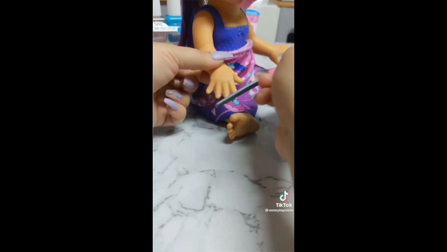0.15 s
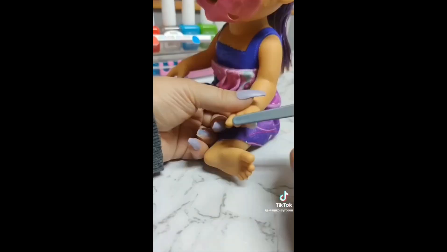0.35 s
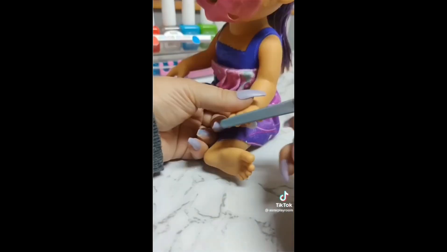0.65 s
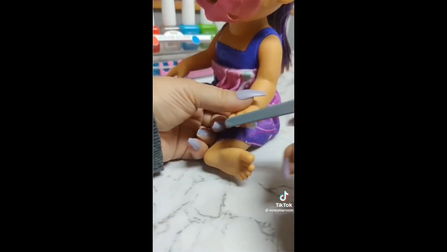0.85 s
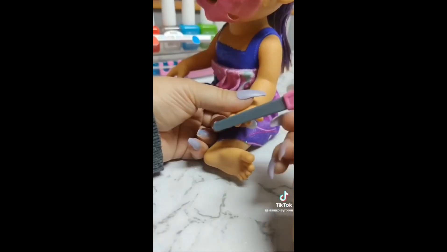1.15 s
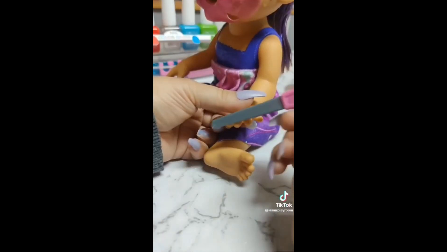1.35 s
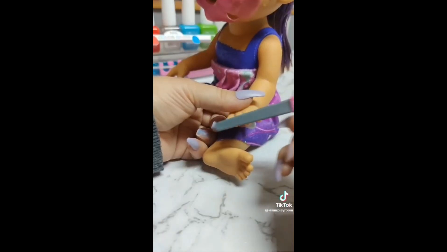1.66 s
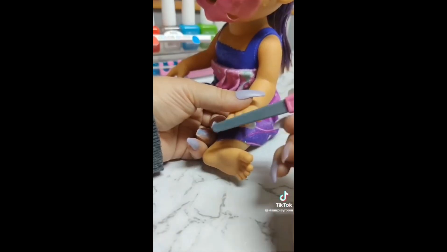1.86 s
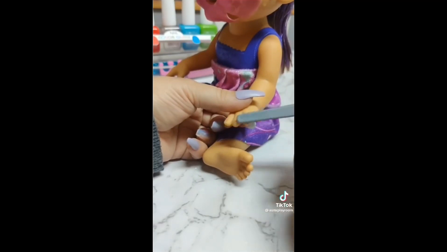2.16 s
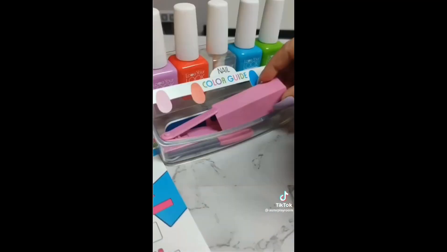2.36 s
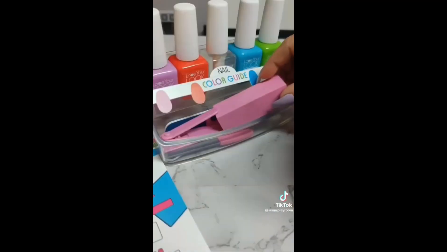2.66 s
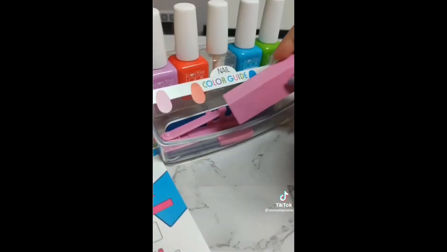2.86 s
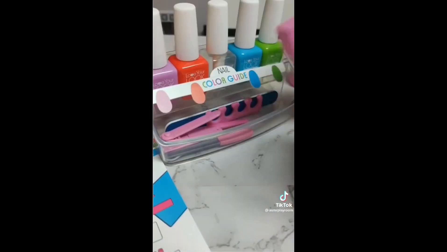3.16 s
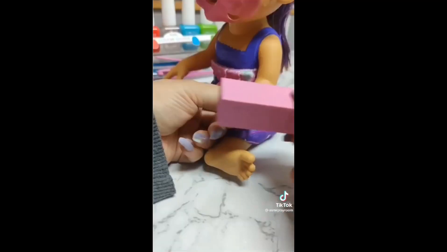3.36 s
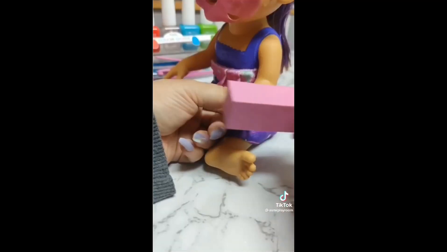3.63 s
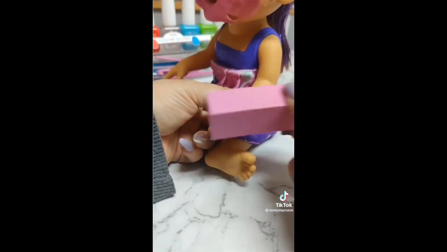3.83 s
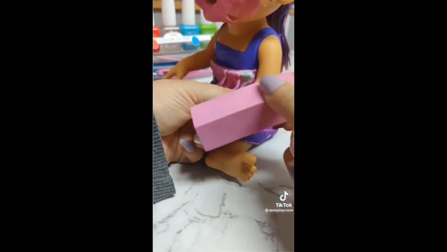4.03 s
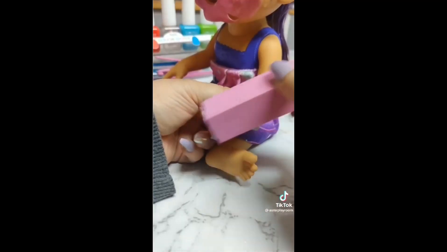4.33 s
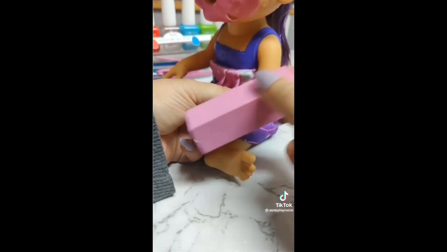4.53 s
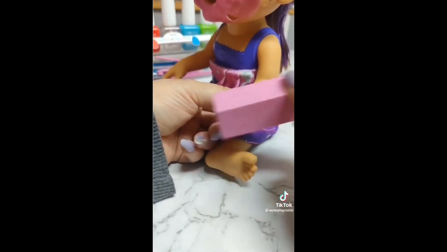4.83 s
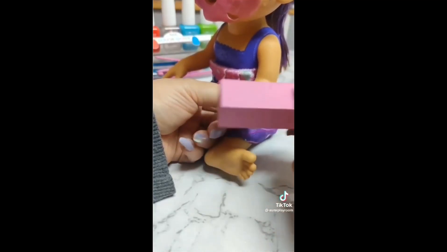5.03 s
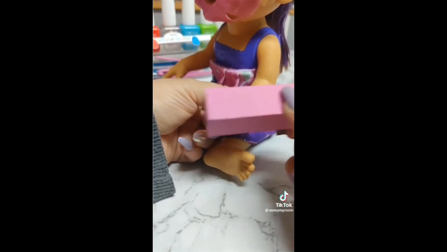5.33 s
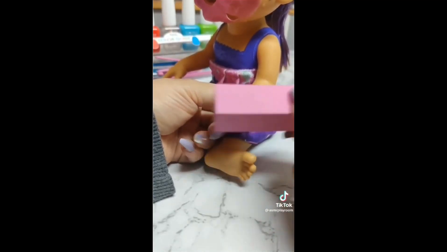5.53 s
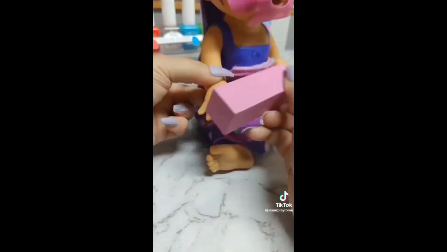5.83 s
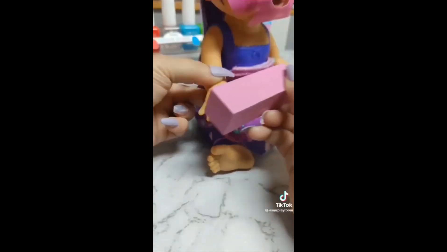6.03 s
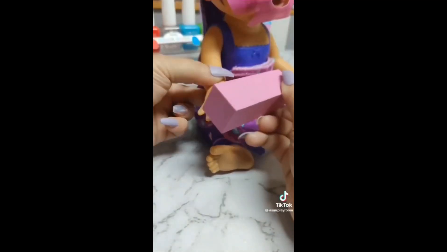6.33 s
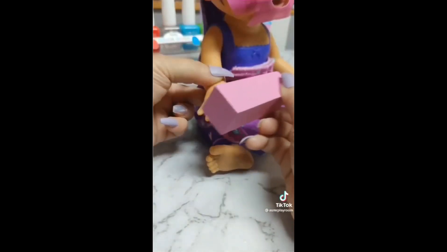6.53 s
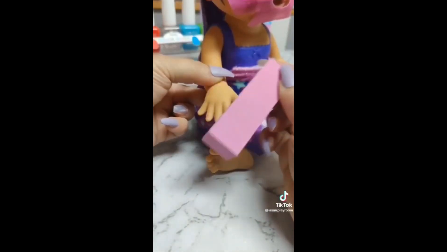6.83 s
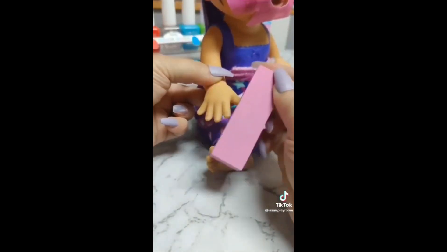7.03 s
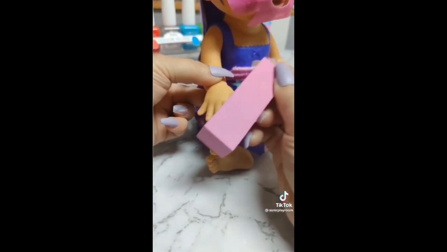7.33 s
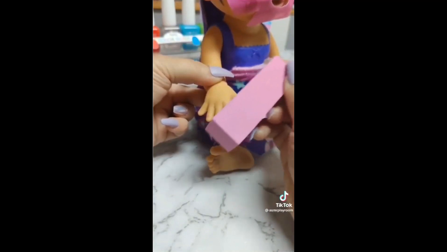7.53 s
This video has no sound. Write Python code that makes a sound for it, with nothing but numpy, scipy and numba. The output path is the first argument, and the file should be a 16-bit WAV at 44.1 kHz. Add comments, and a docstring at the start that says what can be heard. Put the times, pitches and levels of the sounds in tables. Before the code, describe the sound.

Rapid plucky scraping on small plastic fingers, two soft pats, a clattery case knock, then airy back-and-forth buffing close up.

```python
"""Plastic fingers flick and ring under an emery file: pulses of grit drive gliding resonances, decaying sines swing.
Two soft pats follow; a foam block drags out of its case (tinted grit) and knocks it (noise cracks, ringing modes).
The block then hisses to and fro over the nails as bright filtered grit with sliding resonances.
The hollow doll booms as band-passed noise and once bumps the table; taps, rustles and a small rumbling room join."""
import sys
import numpy as np
from scipy import signal
from scipy.fft import rfft, irfft
from scipy.io import wavfile
from scipy.ndimage import uniform_filter1d
from numba import njit

SR = 44100
rng = np.random.default_rng(int(sys.argv[2]) if len(sys.argv) > 2 else 0)


def digitize_waveform(pressure):
    """Quantize a signal to 16-bit integers and store it at the path in sys.argv[1].

    Rows of a 2-D input are taken as channels; values are limited to [-1, 1].
    """
    field = np.atleast_2d(pressure).T
    bounded = np.clip(field, -1, 1)
    quanta = np.round(bounded * 32767).astype(np.int16)
    wavfile.write(sys.argv[1], SR, quanta)


N = 338688
T = np.arange(N) / SR

# Tables: levels are ahead of each source's trims; colours are filter gains.
# Room rumble colour: f/Hz, left/dB, right/dB
ROOM_COLOUR = [(31, 5.5, 3), (60.6, -5, 5.5), (113, -5, -12.5), (166, -17.5, -3), (257, -20.5, -23.5),
               (610, -23.5, -23), (910, -71, -27.5), (1760, -33, -35.5), (4000, -54, -46),
               (5950, -46, -57.5), (9700, -37.5, -33), (13000, -42, -46), (14600, -37, -25)]
# Sleeve on the table: t/s, level/dB
SLEEVE = [(2.15, -71), (2.26, -69), (2.38, -69.5), (2.55, -73), (2.7, -101)]
# Light contacts of tool and doll: t/s, level/dB, centre f/Hz, width/Hz, t60/s
TAPS = [(0.298, -47.5, 3000, 7000, 0.006), (0.304, -49, 1150, 500, 0.026), (2.182, -50, 576, 600, 0.021),
        (2.266, -65, 900, 5050, .01), (2.7644, -49, 3260, 700, 0.07), (5.776, -58, 1200, 2500, .012),
        (6.79, -52.5, 2000, 2000, 0.022), (7.373, -52, 1080, 900, 0.037), (7.372, -48, 3020, 4500, 0.014)]
# Fingertip pats on plastic: t/s, level/dB, f/Hz
PATS = [(2.373, -50, 1050), (2.4954, -37.5, 1065)]
# Firm pushes of the hand on the hollow doll: middle t/s, length/s, level/dB
NUDGES = [(0.1, 0.28, -50.5), (2.815, 0.059, -40.5), (2.91, 0.1, -62), (3.274, 0.12, -55.5),
          (3.777, 0.078, -51.5), (3.928, 0.13, -57), (4.66, 0.21, -53.5), (4.876, 0.11, -50.5),
          (5.147, 0.086, -49), (5.828, 0.039, -48), (6.474, 0.039, -49), (7.079, .11, -49),
          (7.38, 0.18, -50)]
# Fingers shifting grip on the doll: middle t/s, length/s, level/dB
GRIPS = [(0.037, 0.035, -59), (0.136, 0.034, -51.5), (0.267, 0.16, -61), (2.32, 0.62, -102),
         (4.854, 0.019, -55.5), (5.618, 0.2, -64), (7.377, 0.025, -54)]
# Grip colour: f/Hz, left/dB, right/dB
GRIP_COLOUR = [(121, -7, -4), (305, -14, 6.5), (630, -20, 0), (920, 2.5, 5.5), (1970, -10.5, -4.5),
               (3100, -5.5, -2.5), (5900, -21.5, -18), (14000, -28, -49)]
# Doll bumping the table and settling: t/s, level/dB
BUMPS = [(5.1346, -44.5), (5.158, -51)]
# Modes of the hollow doll: f/Hz, level/dB, t60/s
DOLL_MODES = [(172, -8, 0.28), (228, -15, 0.13), (265, -10, 0.21), (305, -0.5, .19), (361, -0.5, 0.29),
              (408, 4, 0.23), (488, 0, 0.23), (526, -6, .11), (713, -5, 0.098), (817, -11, .1),
              (970, -10, .08), (1280, -5, 0.047), (1730, -20, .03)]
# Block knocking and rattling on the case: t/s, level/dB, treble gain/dB
KNOCKS = [(2.803, -41, -21), (2.819, -60, -9), (2.8271, -29.5, 11), (2.8295, -45, 12), (2.8392, -38.5, 14),
          (2.8418, -50.5, 17), (2.852, -52, 6), (2.8661, -51, -12), (2.8777, -40, -8)]
# Modes of the case: f/Hz, level/dB, t60/s
CASE_MODES = [(172, -16, .25), (374, -19, .16), (540, -17, .14), (584, -13, .12), (636, -16, .12),
              (809, -13, .12), (905, -10, .06), (985, 2, .095), (1075, -9, .06), (1156, -6, .09),
              (1355, -10, .1), (1500, -13, .08), (1607, -12, .1), (1727, -13, .09), (1902, -13, .08),
              (3902, -20, .07)]
# Crack colour of the case: f/Hz, left/dB, right/dB
CASE_COLOUR = [(99, -33, -35), (180, -21, -19), (330, -30, -35), (630, -5, -9), (1040, 6.5, 13.5),
               (1500, 5, -4), (2340, -11.5, -13), (3880, -9, -3.5), (5470, -21, -15), (7500, -28, -22),
               (9400, -19, -14.5), (13900, -48, -26)]
# Block dragging along the case: t/s, level/dB
DRAG = [(2.62, -99), (2.70, -64), (2.755, -52.5), (2.775, -46.5), (2.81, -43.5), (2.86, -42), (2.885, -47),
        (2.91, -66), (2.96, -87)]
# Drag colour: f/Hz, left/dB, right/dB
DRAG_COLOUR = [(102, -20, -22), (190, -19, -17), (344, -19, -19), (563, -3, 2), (1120, -10, -10.5),
               (1860, -21, -25), (3220, -22, -21), (4600, -31, -23), (14000, -34, -32.5)]
# Buffing strokes, pull and push in turn: middle t/s, length/s, level/dB, body gain/dB, top-octave gain/dB
BUFF_STROKES = [(3.263, 0.073, -46.5, 1.5, 2), (3.355, 0.071, -43.0, -1.5, 5.5),
                (3.445, 0.082, -46.0, 2, -1.5), (3.534, 0.053, -43.5, -2, 4), (3.621, 0.08, -47, 2, 1),
                (3.71, 0.06, -42, 1, -2.5), (3.798, 0.055, -45, 0, -1), (3.882, 0.066, -42, -1.5, 2),
                (3.967, 0.07, -51, 4.5, 2), (4.061, 0.07, -46, 2.5, 3), (4.15, 0.062, -49.5, 1.5, -3),
                (4.233, 0.054, -46.5, 2.5, 2), (4.325, 0.09, -50, 5.5, 4), (4.428, 0.067, -46.5, 0.5, 1),
                (4.512, 0.065, -49, 3, -1), (4.595, 0.06, -44.5, 0, 1), (4.686, 0.092, -50.0, 4.5, 1),
                (4.787, 0.069, -46.5, 2.5, 0), (4.88, 0.075, -47, -3.5, 0), (4.98, 0.072, -40, 0, 4),
                (5.073, 0.08, -42, -3, -1), (5.166, 0.052, -45.5, 5.5, -1), (5.256, 0.062, -47, 2.0, -1),
                (5.346, 0.07, -41, -3, 2), (5.43, 0.084, -45.5, 1.5, 4.5), (5.52, 0.063, -38, -5, 0),
                (5.593, 0.06, -52, 4.5, 0), (5.807, 0.049, -48, -1.5, 4), (5.874, 0.072, -45.5, -2.5, 2),
                (5.962, 0.061, -44.5, 4, 4), (6.038, 0.066, -43, -3, 2), (6.124, 0.064, -43, -0.5, 4),
                (6.2, 0.061, -42.5, 1, -6), (6.283, 0.059, -44.0, -1, -2.5),
                (6.364, 0.063, -45.5, 0.5, -2.0), (6.449, 0.059, -46.5, 2.5, -4.0),
                (6.53, 0.063, -44.0, -1, -2), (6.621, 0.068, -43.5, 2, 1), (6.693, 0.055, -42, -3, -5),
                (6.766, 0.057, -46.5, -1, 2.0), (6.839, 0.059, -52.5, 1.5, -1),
                (6.918, 0.047, -51, 1.5, -3.0), (6.987, 0.061, -50.5, -3, -2), (7.078, 0.093, -47, 2, 0),
                (7.356, 0.057, -51.5, 1, 0), (7.43, 0.064, -54.0, -1, 1.0),
                (7.518, 0.043, -49.5, -2.5, -4.5), (7.579, 0.076, -53, -2.5, -1.5),
                (7.675, 0.073, -46.5, 4.5, 0.0)]
# Spells of block on nails: start t/s, end t/s, lift-off time/s
BUFF_SPELLS = [(3.225, 5.627, .25), (5.768, 7.119, 0.056), (7.297, 7.75, .05)]
# Finger murmur under the block: t/s, level/dB
BLOCK_HOLD = [(3.26, -70.5), (4.15, -63.5), (4.8, -65.5), (5.5, -61), (5.82, -76), (6.45, -72.5),
              (7.08, -70), (7.68, -70.5)]
# Colour of the block's flat face: f/Hz, left/dB, right/dB
FACE_COLOUR = [(500, -47, -32), (1720, -21, -18.5), (2470, -13, -8), (3030, -9.5, -10),
               (3510, -15.5, -15.0), (4540, -8, -3), (5340, -12, -9.5), (6100, -6, -9.5), (6550, -17, -5),
               (6520, -7, 0.5), (8560, -7, -7.5), (8900, -4.5, -3), (10880, -6, -5.5), (11640, -15.5, -10),
               (12800, -19, -13.5), (14700, -8, -2), (15900, -12, -6.5)]
# Colour of the block's edge: f/Hz, left/dB, right/dB
EDGE_COLOUR = [(500, -37, -44), (1780, -21, -14.5), (2580, -10, -9.5), (3200, -12.5, -13), (3730, -13, -3),
               (4440, -3, -2.5), (5100, -12, -0.5), (5500, -20, -1), (5960, 1, -3), (6580, -13, -5.5),
               (7040, -11.5, 6.5), (7700, -9, -3.5), (8700, -4.5, 3.5), (9940, -2, -1.5),
               (11630, -10.0, -8.0), (13000, -13, -13), (15000, -9, -3), (15400, -7, -9.5)]
# Filing strokes, pull and push in turn: start t/s, length/s, grit level/dB, finger level/dB, board f/Hz
FILE_STROKES = [(0.018, 0.045, -76, -36, 3000), (0.117, 0.053, -77, -39, 2900),
                (0.233, 0.035, -53.5, -39, 2940), (0.347, 0.052, -52.5, -29.5, 3080),
                (0.447, 0.046, -63.5, -30, 2520), (0.524, 0.059, -57, -40, 3140),
                (0.621, 0.048, -56, -32, 3500), (0.718, 0.026, -56, -33.5, 3060),
                (0.799, 0.04, -55, -31, 3100), (0.879, 0.044, -58.5, -32, 3000),
                (0.965, 0.053, -53.5, -31, 2600), (1.054, 0.047, -55.5, -33, 3100),
                (1.145, 0.052, -57, -31.5, 3010), (1.245, 0.04, -53.5, -35.5, 3060),
                (1.33, 0.029, -54.5, -30, 4390), (1.414, 0.028, -63.5, -37, 4130),
                (1.518, 0.031, -52.5, -32.5, 2330), (1.588, 0.056, -56, -28.5, 3000),
                (1.686, 0.043, -53.5, -28.5, 3060), (1.749, 0.093, -56.5, -51, 2970),
                (1.854, 0.047, -56, -33.5, 3140), (1.927, 0.052, -57, -34.5, 2370),
                (2.018, 0.048, -63, -35, 2450), (2.093, 0.075, -56.5, -40, 3130)]
# File scratch colour: f/Hz, left/dB, right/dB
FILE_COLOUR = [(406, -16.5, -12.5), (630, -15, -15), (970, -12, 0), (2100, -14, -10.5), (3050, -17, -11),
               (3470, -20, -15), (3900, -13.5, -9), (5000, -23.5, -21), (6100, -19, -16.5),
               (6500, -34, -27), (6830, -28, -11), (8200, -26, -16.5), (9340, -20, -15), (11150, -32, -27),
               (12500, -36, -30), (15100, -20.5, -29.5)]
# Firmness of the file on the fingers: t/s, share/0-1
FILE_BITE = [(.17, 0), (.3, 0.72), (2.15, 0.86), (2.28, 0)]
# Mid-stroke finger pitch, set by where the file lies: t/s, f/Hz
FINGER_PITCH = [(.03, 810), (.22, 730), (.36, 1310), (.55, 1404), (.95, 1370), (1.2, 1225), (1.8, 1200),
                (2.13, 1370)]
# Fingers flicking free of the file one by one: t/s, level/dB, f/Hz, snap gain/dB
FLICKS = [(0.0285, -36.5, 814, -24), (.055, -40, 854, -32), (.1208, -36, 720, -28), (0.1363, -36, 684, -33),
          (0.1532, -37.5, 694, -30), (0.2191, -35.5, 795, -26), (0.234, -38, 800, -24),
          (0.2454, -50, 1200, -10), (0.3473, -32.5, 1010, -14), (0.3589, -39, 1240, 4),
          (0.368, -34, 1370, -5.5), (0.3765, -37, 1370, -8), (0.468, -42, 1420, -10),
          (0.4765, -36.5, 1150, -14), (0.528, -37, 1340, -6), (0.5412, -40, 1390, -15),
          (0.55, -45, 1350, -13), (0.6399, -37.5, 1400, -8), (0.6493, -33, 1330, -13),
          (0.6614, -35, 1100, -25), (0.718, -42, 1370, -20), (0.7325, -41, 1350, -1),
          (0.797, -40, 1520, -9), (0.8092, -38, 1440, -2), (0.8209, -29, 1460, -13),
          (0.834, -32, 1150, -11.5), (0.882, -34, 1320, -7.5), (0.895, -37, 1450, -20),
          (0.906, -41, 1230, -18), (0.977, -34.5, 1430, -3.5), (0.9882, -29.5, 1390, -9),
          (0.999, -29, 1330, -7.5), (1.013, -37, 1110, -27), (1.0574, -39, 1180, -12),
          (1.072, -37, 1300, -20), (1.084, -41, 1390, -8), (1.0968, -41, 1440, -19),
          (1.149, -39, 1380, -12), (1.159, -38, 1190, -2), (1.172, -30, 1040, -18), (1.185, -32, 1090, -21),
          (1.2385, -42, 1000, -16), (1.2682, -42, 1420, -2), (1.3456, -35.5, 1380, -17),
          (1.532, -34.5, 1020, -17), (1.546, -37, 1290, -26), (1.589, -35, 990, -26),
          (1.6032, -31.5, 1120, -12), (1.613, -39, 1270, -6), (1.6242, -35, 1480, -13),
          (1.6832, -37, 1450, -4), (1.6965, -33, 1440, -15), (1.7076, -32.5, 1270, -25),
          (1.7198, -43, 1210, 1.5), (1.775, -41.5, 1000, -5), (1.7903, -41, 1320, -6),
          (1.804, -42, 1340, -12), (1.8607, -34.5, 1340, -13), (1.875, -32.5, 1270, -23),
          (1.893, -39, 1290, -11), (1.9286, -36, 1080, -23), (1.944, -39, 1300, -21),
          (1.9574, -44, 1400, -10), (1.969, -47, 1410, -18), (2.0262, -34.5, 1470, -11),
          (2.0384, -32, 1400, -22), (2.0514, -32.5, 1070, -14.5), (2.1049, -33, 1340, -18),
          (2.1163, -33, 1400, -3.5), (2.1244, -38, 1360, -3), (2.133, -39, 1330, -15),
          (2.1446, -41.5, 1450, 3)]
# Grit snap colour: f/Hz, left/dB, right/dB
SNAP_COLOUR = [(900, -16, -4), (2000, -11, -7), (2600, 20, -13), (3930, -15, 7), (4900, -5, -13),
               (6860, -9, 10.5), (8260, -7, 1), (9000, -11, 10.5), (10750, -22, -11), (12200, -35, -21),
               (15400, -18, -1.5)]
# Phase between two microphone ports for rubbing: f/Hz, phase/rad
PORT_PHASE = [(600, 0), (1500, -.5), (2200, -3), (4250, -3.2), (4800, -5.5), (5800, -6.28)]

TOP_HZ = 15450
PULL_GLIDE, PUSH_GLIDE = -0.59, 0.6  # pitch change over one stroke at full bite, as a share
RUB_RING_DB = -18.5  # steady rubbing rings the fingers much less than a flick
EDGE_FROM_S, EDGE_TO_S = 5.7, 6.805  # block held on its edge
TOUCH_S = 0.006  # landing time of the block
REST_DB = -62  # block hiss as it turns between strokes


def undb(db):
    """Decibels to gain."""
    return 10 ** (np.asarray(db) / 20)


def unit(x):
    """Scale so that the mean of the channels has rms 1 (about its average)."""
    return x / np.atleast_2d(x).mean(0).std()


def fade(t60_s, size):
    """Exponential decay, -60 dB at t60_s."""
    return np.exp(-np.log(1000) * np.arange(size) / SR / t60_s)


def add(out, start_s, x):
    """Mix x into out from start_s."""
    i = int(start_s * SR)
    out[..., i:i + x.shape[-1]] += x[..., :N - i]


def ears(left, right):
    """Gains of the two channels as a column."""
    return np.array([[left], [right]])


def resonate(x, hz, width_hz):
    """One resonance, gain 1 at its centre."""
    return signal.lfilter(*signal.iirpeak(hz, hz / width_hz, fs=SR), x)


def resonate_twice(x, hz, width_hz, second_width_hz):
    """Two resonances in series at one centre."""
    return resonate(resonate(x, hz, width_hz), hz, second_width_hz)


@njit
def glide(x, hz, width_hz):
    """State-variable band-pass whose centre moves every sample."""
    y, band, low = np.empty(len(x)), 0., 0.
    for i in range(len(x)):
        g, k = np.tan(np.pi * hz[i] / SR), width_hz / hz[i]
        v = (band + g * (x[i] - low)) / (1 + g * (g + k))
        band, low, y[i] = 2 * v - band, low + 2 * g * v, k * v
    return y


def treble(x, hz):
    """The part of x above hz."""
    return signal.sosfilt(signal.butter(1, hz, "high", fs=SR, output="sos"), x)


def colour(x, points, order=8192):
    """Minimum-phase filter with its own spectrum for each ear."""
    hz, *levels_db = np.transpose(points)
    log_f = np.log(np.maximum(np.fft.rfftfreq(order, 1 / SR), 1))
    cepstrum = irfft([np.log(undb(np.interp(log_f, np.log(hz), db))) for db in levels_db])
    cepstrum[:, 1:order // 2] *= 2  # fold onto positive time: causal
    cepstrum[:, order // 2 + 1:] = 0
    response = irfft(np.exp(rfft(cepstrum)))
    return signal.fftconvolve(np.atleast_2d(x), response, axes=1)[:, :x.shape[-1]]


def tint(x, points):
    """Zero-phase spectrum of a steady rubbing for each ear."""
    hz, *levels_db = np.transpose(sorted(points))
    log_f = np.log(np.maximum(np.fft.rfftfreq(N, 1 / SR), 1))
    return irfft(rfft(x) * undb([np.interp(log_f, np.log(hz), db) for db in levels_db]), N)


def pair(apart, size=N):
    """Left and right noise: a shared part and a part of their own."""
    return rng.standard_normal(size) + apart * rng.standard_normal((2, size))


def grit(rate_hz, spread_db, apart):
    """Dense tiny impacts of abrasive grains of uneven size."""
    sizes = undb(spread_db * np.minimum(rng.exponential(size=N), 5))
    return pair(apart) * sizes * (rng.random(N) < rate_hz / SR)


def flutter(rate_hz):
    """Random wander, linear between rate_hz knots per second, spread near 1."""
    return 1.2 * np.interp(T * rate_hz, np.arange(N // 8), rng.standard_normal(N // 8))


def swell(middle_s, length_s, db, flat):
    """Gain of a row of strokes: the hand speeds up, glides and stops to turn."""
    coarse_t, power = T[::16], 0
    for middle, length, level_db in zip(middle_s, length_s, db):
        travel = np.minimum(np.abs(2 * (coarse_t - middle) / length), 4)
        power = power + undb(2 * level_db) * np.exp(-2 * travel ** flat)
    return np.sqrt(power).repeat(16)[:N]


def nearest(middle_s):
    """Index of the stroke nearest to each moment."""
    return np.searchsorted((middle_s[1:] + middle_s[:-1]) / 2, T)


def ports(x):
    """Two ports hear the upper midrange of the rubbing in opposite phase."""
    turn = np.interp(np.fft.rfftfreq(N, 1 / SR), *np.transpose(PORT_PHASE))
    return np.array([x[0], irfft(rfft(x[1]) * np.exp(-1j * turn), N)])


def hand_echo(x, middle_s):
    """The hand reflects the rubbing with a new lag on each stroke, which ripples the colour."""
    lag_s = uniform_filter1d(rng.uniform(.0004, .0018, len(middle_s))[nearest(middle_s)], 300)
    source = np.maximum(np.arange(N) - (lag_s * SR).astype(int), 0)
    return x + .55 * x[:, source]


def contact_patches(x, middle_s, low_hz, high_hz, patchy_db, count=12):
    """Each new patch of contact favours other pitches, shifting as the tool slides."""
    f, spectrum, out = np.fft.rfftfreq(N, 1 / SR), rfft(x), 0
    centres_hz = np.linspace(low_hz, high_hz, count)
    for band in np.eye(count):
        db = patchy_db * np.interp(T, middle_s, rng.standard_normal(len(middle_s)))
        out = out + irfft(spectrum * np.interp(f, centres_hz, band), N) * undb(db)
    return out


def background(floor_db=-56, hum_db=-67, sway_db=-51):
    """Low room rumble with faint hiss, a wavering hum and a very deep sway of the air."""
    air = unit(treble(colour(pair(0.64), ROOM_COLOUR), 2.2)) * undb(0.32 * flutter(6.5))
    hum = np.sin(2 * np.pi * 59 * T) * undb(4.0 * flutter(8.6))
    sway = unit(resonate(resonate(pair(0.92), 11.1, 5.2), 14.3, 33))
    return undb(floor_db) * air + (undb(hum_db) * hum + undb(sway_db) * sway) * ears(.8, 1.2)


def room(x, wet_db=-13, t60_s=0.15):
    """Table and near walls return a short, slightly dull tail: decaying noise."""
    tail = rng.standard_normal((2, 16000)) * fade(t60_s, size=16000)
    tail -= .5 * treble(tail, 3700)
    tail[:, :int(.002 * SR)] = 0
    tail /= np.sqrt((tail ** 2).sum(1, keepdims=True))
    return x + undb(wet_db) * signal.fftconvolve(x, tail, axes=1)[:, :N]


def sleeve(hz=360, width_hz=300):
    """Cloth brushes the table: sparse grains in a low resonance, level fluttering."""
    cloth = unit(resonate_twice(grit(rate_hz=720, spread_db=6, apart=1.0), hz, width_hz, 2 * width_hz))
    level_db = np.interp(T, *np.transpose(SLEEVE), left=-150, right=-150)
    return cloth * undb(level_db + 2 * flutter(29.3))


def tool_taps(trim_db=1, skirt=0.73):
    """Short, damped contacts: noise in one broad resonance each."""
    out = np.zeros((2, N))
    for s, db, hz, width_hz, t60_s in TAPS:
        body = resonate_twice(pair(1.0, size=8192), hz, width_hz, min(skirt * width_hz, SR / 3))
        add(out, s, undb(db + trim_db) * unit(body) * fade(t60_s, size=8192))
    return out


def pats(size=2048, rise_s=.0022):
    """A soft push rings the plastic for a few rounded cycles, without any click."""
    out, t = np.zeros(N), T[:size]
    bloom = (t / rise_s * np.exp(1 - t / rise_s)) ** 2
    for s, db, hz in PATS:
        add(out, s, undb(db) * bloom * np.sin(2 * np.pi * hz * t))
    return out * ears(.8, 1.2)


def table_bump(thud_db=-2, thud_t60_s=0.016, thud_hz=800):
    """The doll drops lightly on the table and settles: a dull click with the modes of its body."""
    out, size = np.zeros((2, N)), 12000
    ring = sum(undb(db) * np.sin(2 * np.pi * hz * T[:size]) * fade(t60_s, size)
               for hz, db, t60_s in DOLL_MODES)
    for s, db in BUMPS:
        thud = unit(resonate_twice(pair(0.98, size), thud_hz, 1000, 1600)) * fade(thud_t60_s, size)
        add(out, s, undb(db) * (undb(thud_db) * thud - ring * ears(.8, 1.2) / 2))
    return out


def doll_body(push_trim_db=-6.5, rock_trim_db=-17, rock_s=0.019, scatter_db=3):
    """Hand pushes boom in the hollow doll, each buffing stroke rocks it, and skin rustles on it."""
    middle, length, db = np.transpose(NUDGES)
    pushes = swell(middle, length, db + push_trim_db, flat=3.4)
    middle, _, db = np.transpose(BUFF_STROKES)[:3]
    rock_db = db + rock_trim_db + scatter_db * rng.standard_normal(len(db))
    rocking = swell(middle, np.full(len(db), rock_s), rock_db, flat=0.94)
    boom = unit(resonate(resonate(pair(.3), 170, 55), 174, 90))
    boom = boom * np.hypot(pushes, rocking) * ears(.55, 1.45)
    skin = unit(colour(grit(rate_hz=4000, spread_db=1.8, apart=0.96), GRIP_COLOUR))
    return boom + skin * swell(*np.transpose(GRIPS), flat=0.78)


def plastic_case(crack_db=1, ring_db=-5, flex_db=4, flex_hz=900, flex_t60_s=0.0069, drag_trim_db=-3):
    """The block drags out of the thin case, whose wall flexes, cracks and rings at each knock."""
    out, size = np.zeros((2, N)), 12000
    t = T[:size]
    ring = sum(undb(db) * np.sin(2 * np.pi * hz * t) * fade(t60_s, size) for hz, db, t60_s in CASE_MODES)
    ring = ring * (1 - np.exp(-t / .0003))  # builds up as the blow spreads over the wall
    flex = np.sin(2 * np.pi * flex_hz * t) * fade(flex_t60_s, size)
    for s, db, bright_db in KNOCKS:
        crack = unit(colour(pair(.6, size), CASE_COLOUR)) * fade(.027, size)
        blow = undb(crack_db) * crack - undb(ring_db) * ring - undb(flex_db) * flex
        add(out, s, undb(db) * (blow + (undb(bright_db) - 1) * treble(blow, 1800)))
    drag = unit(tint(grit(rate_hz=2800, spread_db=0.5, apart=0.74), DRAG_COLOUR))
    drag_db = np.interp(T, *np.transpose(DRAG), left=-150, right=-150) + drag_trim_db
    return out + drag * undb(drag_db)


def nail_whistles(hiss, middle_s, length_s, gain=0.68):
    """Narrow resonances of the touched nail, new on every stroke, slide as the block moves."""
    k = nearest(middle_s)
    slide = 1 + .02 * (-1.) ** k * np.clip((T - middle_s[k]) / length_s[k], -1, 1)
    for low_hz, high_hz in [(6800, 8000), (8200, 9600), (9600, 11000)]:
        hz = rng.uniform(low_hz, high_hz, len(middle_s))[k] * slide
        hiss = hiss + gain * np.array([glide(ear, hz, 200.0) for ear in hiss])  # in series
    return hiss


def buffer_block(hiss_trim_db=-1, low_split_hz=6000, top_split_hz=11800, finger_trim_db=1):
    """Very fine grit hisses on every stroke; pressure and angle change its body and top octave."""
    middle, length, db, body_db, top_db = np.transpose(BUFF_STROKES)
    grains = grit(rate_hz=16000, spread_db=1.8, apart=0.7)
    on_edge = (T > EDGE_FROM_S) & (T < EDGE_TO_S)
    hiss = np.where(on_edge, unit(tint(grains, EDGE_COLOUR)), unit(tint(grains, FACE_COLOUR)))
    hiss = hand_echo(ports(hiss), middle)
    hiss = contact_patches(hiss, middle, low_hz=3670, high_hz=14400, patchy_db=2.36)
    hiss = unit(nail_whistles(hiss, middle, length)) * undb(.9 * flutter(110))
    # body, presence and top bands, rebalanced from stroke to stroke
    f = np.maximum(np.fft.rfftfreq(N, 1 / SR), 1000)
    above_low, above_top = (irfft(rfft(hiss) / (1 + (hz / f) ** 20), N)
                            for hz in (low_split_hz, top_split_hz))
    body = undb(np.interp(T, middle, body_db)) * (hiss - above_low)
    top = undb(np.interp(T, middle, top_db)) * above_top
    hiss = body + above_low - above_top + top
    contact = swell(middle, length * 2.0, np.full(len(db), REST_DB), flat=1.36)
    hissing = hiss * np.hypot(swell(middle, length, db + hiss_trim_db, flat=3.12), contact)
    # soft foam damps the fingers to a murmur
    fingers = unit(resonate_twice(grit(rate_hz=1500, spread_db=2.5, apart=0.93), 980, 216, 1800))
    ring_db = np.interp(middle, *np.transpose(BLOCK_HOLD)) + finger_trim_db
    murmur = fingers * ears(.7, 1.3) * swell(middle, length, ring_db, flat=1.16)
    touching = sum(np.clip(np.minimum((T - start) / TOUCH_S, (end - T) / lift_s + 1), 0, 1)
                   for start, end, lift_s in BUFF_SPELLS)
    return touching * (hissing + murmur)


def bite():
    """Grip of the file: none while it only nudges the fingers, strong while it saws."""
    return np.clip(np.interp(T, *np.transpose(FILE_BITE)), 0, 1)


def finger_hz():
    """The fingers' pitch falls through a pull and rises through a push."""
    start, length = np.transpose(FILE_STROKES)[:2]
    middle = start + length / 2
    k = nearest(middle)
    travel = np.clip((T - middle[k]) / length[k], -.6, .6)
    bend = 1 + np.where(k % 2, PUSH_GLIDE, PULL_GLIDE) * travel * bite()
    return uniform_filter1d(np.interp(T, *np.transpose(FINGER_PITCH)) * bend, size=200)


def grain_ticks(ridge_hz=330, t60_s=.007):
    """The coarsest grains catch one after another and chop the rubbing into quick ticks."""
    passed = np.floor(np.cumsum(ridge_hz * undb(3 * flutter(200))) / SR)
    catches = np.diff(passed, prepend=0) * undb(1.46 * rng.standard_normal(N))
    return .45 + .55 * unit(signal.fftconvolve(catches, fade(t60_s, size=1024))[:N])


def finger_ring(drive, hz, ratio, width_hz=290):
    """Two band-passes in series follow one partial of the fingers."""
    hz, width_hz = hz * ratio, width_hz * ratio
    return unit(np.array([glide(glide(ear, hz, width_hz), hz, 2 * width_hz) for ear in drive]))


def emery_file(grit_trim_db=1, rest_db=-66, idle_db=-66, overtone=2.05, overtone_db=-11,
               board_db=-4, board_width_hz=330.):
    """Coarse grit rasps, rings the thin board and keeps the fingers ringing at a gliding pitch."""
    start, length, rasp_db, ring_db, board_hz = np.transpose(FILE_STROKES)
    middle, hz = start + length / 2, finger_hz()
    ticking = grain_ticks()
    scratch = tint(ticking * grit(rate_hz=6000, spread_db=-1.0, apart=1.14), FILE_COLOUR)
    scratch = hand_echo(ports(scratch), middle)
    scratch = unit(contact_patches(scratch, middle, low_hz=1800, high_hz=8000, patchy_db=2.5))
    drive = ticking * grit(rate_hz=4500, spread_db=2.4, apart=1.0)
    fingers = finger_ring(drive, hz, 1.) * ears(.8, 1.2)
    fingers = fingers + undb(overtone_db) * ports(finger_ring(drive, hz, overtone))
    # board pitch is set by where it touches
    board_drive = ticking * grit(rate_hz=4300, spread_db=-1.5, apart=0.64)
    board = np.array([glide(ear, board_hz[nearest(middle)], board_width_hz) for ear in board_drive])
    scratch = scratch + undb(board_db) * ports(unit(board))
    # the file settles on the fingers and stays on them between strokes
    grip = bite()
    rasping = scratch * (swell(middle, length, rasp_db + grit_trim_db, flat=2.07) + grip * undb(rest_db))
    ring_gain = np.hypot(swell(middle, length, ring_db + RUB_RING_DB, flat=3.7), undb(idle_db))
    return rasping + fingers * grip * ring_gain


def flicks(ring_db=9.5, ring_t60_s=0.0081, soft_t60_s=0.014, rise_s=0.0013, sag=0.16, sag_s=0.0011,
           snap_db=6, snap_t60_s=0.0031, slip_s=.0004, tail_db=-16, tail_t60_s=0.021,
           tick_db=-4, tick_hz=1900, tick_t60_s=0.00073,
           board_db=-9, board_t60_s=0.013, board_overtone=1.35):
    """A finger tears loose with a grit snap and board tick, then swings, its pitch sagging as it leaves."""
    rings, boards, snaps, size = np.zeros(N), np.zeros(N), np.zeros((2, N)), 2048
    t = T[:size]
    start, length, _, _, board_hz = np.transpose(FILE_STROKES)
    tick = np.sin(2 * np.pi * tick_hz * t) * fade(tick_t60_s, size)
    burst = fade(snap_t60_s, size) + undb(tail_db) * fade(tail_t60_s, size)
    burst = burst * (1 - np.exp(-t / 0.0004))
    bend = 1 + sag * (np.exp(-t / sag_s) - 1 / np.e)
    for s, db, hz, bright_db in FLICKS:
        # a loosely held finger rings lower and longer
        t60_s = np.interp(hz, [750, 1200], [soft_t60_s, ring_t60_s])
        swing = -np.sin(2 * np.pi * hz * np.cumsum(bend) / SR) * fade(t60_s, size)
        swing = swing * (1 - np.exp(-t / rise_s)) * ring_t60_s / t60_s
        stiffness = (min(hz, 1400) / 1300) ** 1.5
        add(rings, s, undb(db + ring_db) * swing - undb(db + tick_db) * stiffness * tick)
        stroke = np.abs(start + length / 2 - s).argmin()
        turn = 2 * np.pi * board_hz[stroke] * t * (1 + .04 * rng.standard_normal())
        board = (np.sin(turn) + 0.47 * np.sin(board_overtone * turn)) * fade(board_t60_s, size)
        add(boards, s, undb(db + board_db) * np.sqrt(stiffness) * board)
        add(snaps, s - slip_s, undb(db + bright_db + snap_db) * burst)
    snaps = snaps * unit(ports(tint(pair(0.67), SNAP_COLOUR)))
    # the board faces the two ears with opposite sides
    return rings * ears(.75, 1.25) + boards * ears(-.7, 1.2) + snaps


def scene():
    """All handling sounds in the room, over its background."""
    handling = sleeve() + tool_taps() + pats() + table_bump() + doll_body()
    handling = handling + plastic_case() + buffer_block() + emery_file() + flicks()
    return background() + room(handling)


def record(dry):
    """The phone cuts the top: steep low-pass at TOP_HZ."""
    return signal.sosfilt(signal.ellip(10, .2, 70, TOP_HZ, fs=SR, output="sos"), dry)


dry = scene()
out = record(dry)
digitize_waveform(out)
```